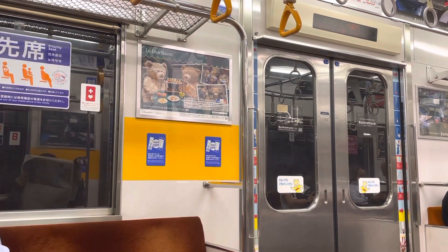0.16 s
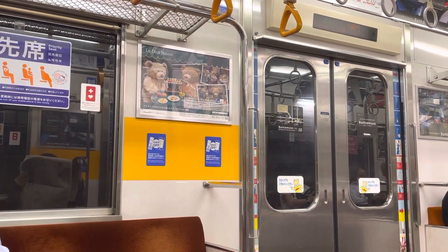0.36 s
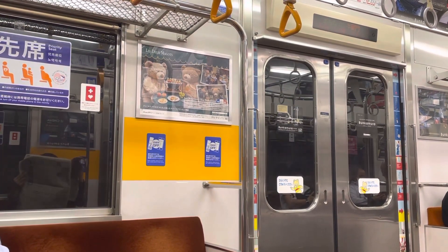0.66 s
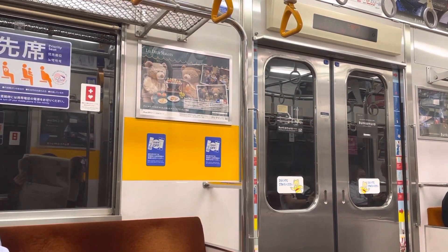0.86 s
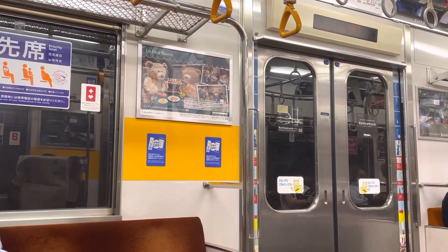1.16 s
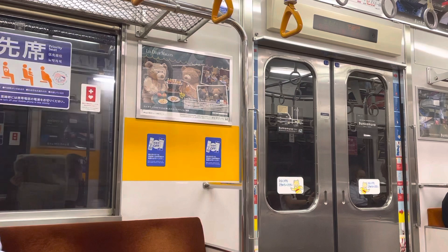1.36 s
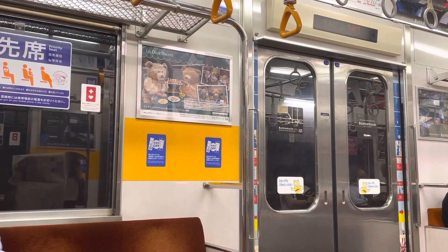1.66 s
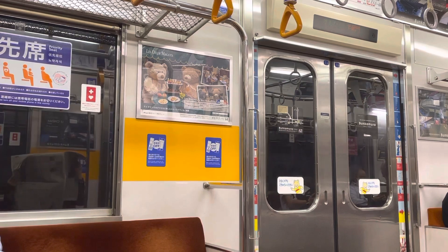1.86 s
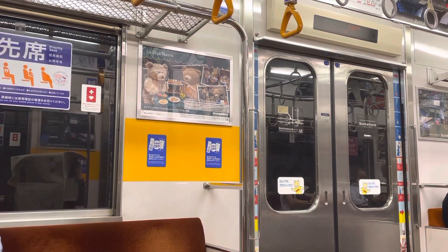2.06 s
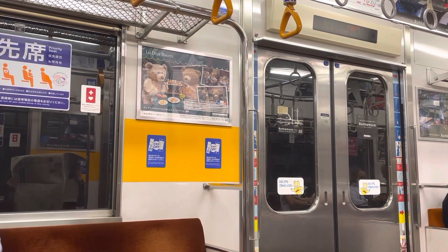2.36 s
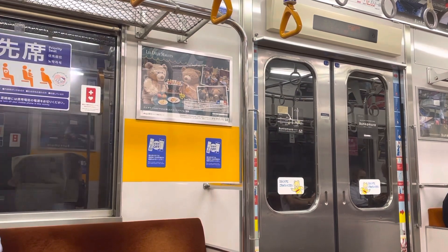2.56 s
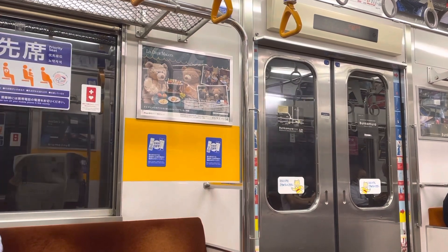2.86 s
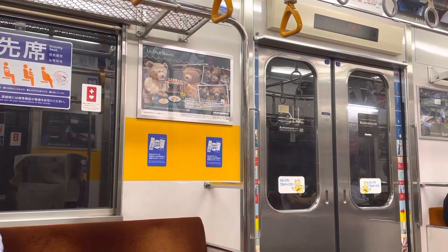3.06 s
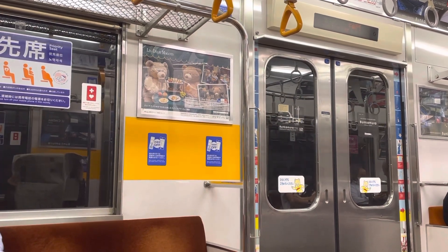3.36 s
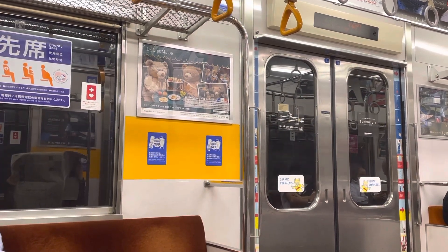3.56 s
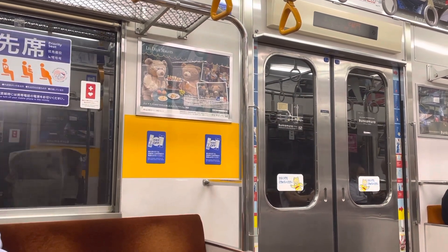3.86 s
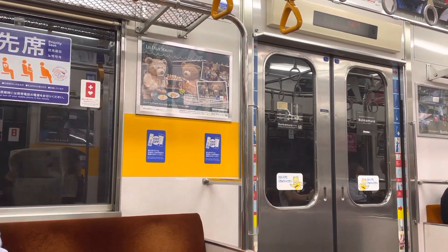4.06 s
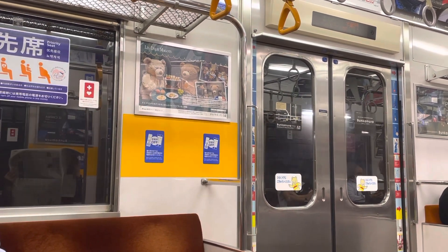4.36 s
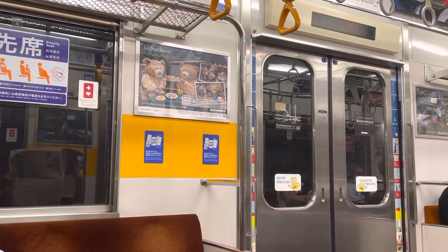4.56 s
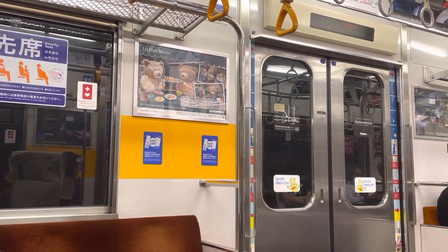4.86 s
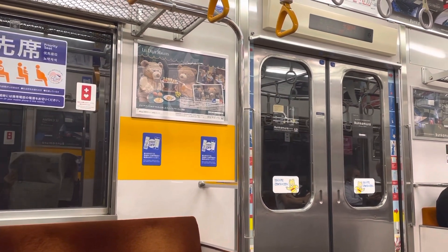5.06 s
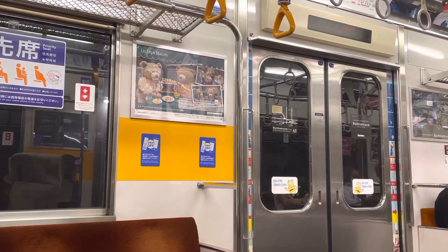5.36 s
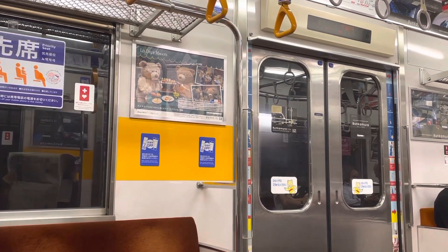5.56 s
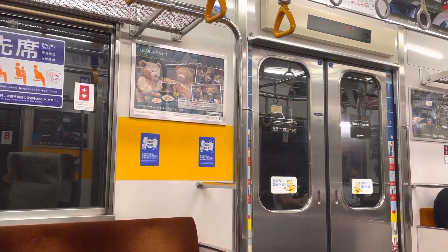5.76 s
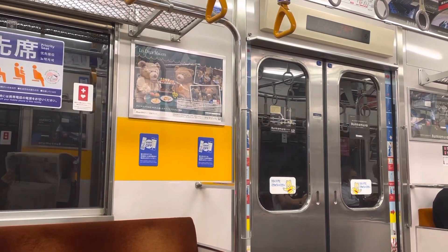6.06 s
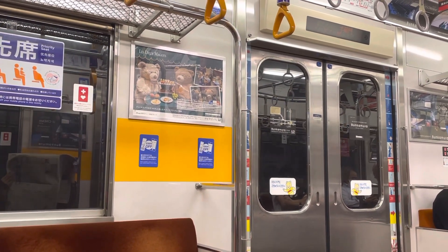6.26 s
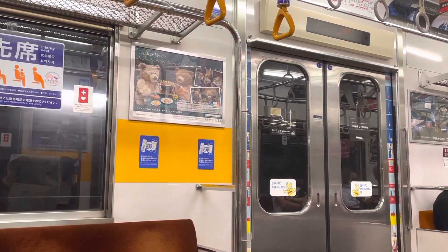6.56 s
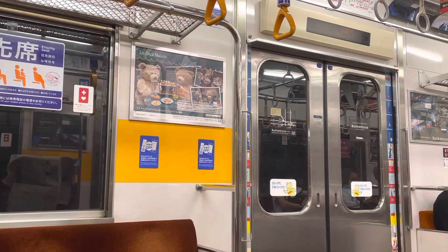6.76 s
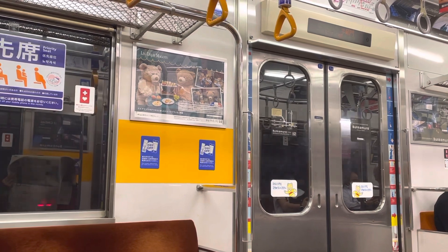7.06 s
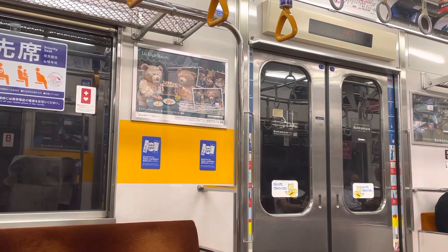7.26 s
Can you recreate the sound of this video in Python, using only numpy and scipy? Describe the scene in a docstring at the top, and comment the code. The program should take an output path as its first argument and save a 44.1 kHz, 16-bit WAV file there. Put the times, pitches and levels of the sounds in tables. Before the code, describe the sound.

Heard from a seat by the door of a moving subway car: two underfloor machines hum low and beat about twice a second under steady rumble and airy ventilation. From about two seconds the wheel roar and low rail howl surge louder, with joint thumps and brief rough squeaks. Near five and a half seconds the roar drops and compressed air hisses, then again more faintly.

```python
"""Two machines under the floor hum and beat against each other, heard inside a subway car in a tunnel.
The body rumbles; filtered noise makes the wheels' roar, which swells and dies away over the ventilation.
Ripples on the rail howl in surges, bands of the roar swell briefly, and a few thin, rough squeaks sound.
Wheels thump over rail joints as decaying booms and knocks, and compressed air blows off twice as hiss."""
import sys
import numpy as np
from scipy import signal
from scipy.fft import irfft, next_fast_len
from scipy.io import wavfile
from scipy.ndimage import uniform_filter1d, map_coordinates

SR = 44100
rng = np.random.default_rng(int(sys.argv[2]) if len(sys.argv) > 2 else 0)


def generate_wav(sig):
    """Save sig (samples, or channels by samples) to the path in sys.argv[1] as 16-bit PCM at SR."""
    pcm = np.round(np.clip(np.atleast_2d(sig).T, -1, 1) * 32767).astype(np.int16)
    wavfile.write(sys.argv[1], SR, pcm)


N = 326763
TIME = np.arange(N) / SR  # s
FREQ = np.maximum(np.fft.rfftfreq(2 * next_fast_len(N // 2 + 1), 1 / SR), 1)  # Hz, kept above 0 for the logs


def undb(db):
    """Turn decibels into an amplitude ratio."""
    return 10 ** (np.asarray(db) / 20)


def shape(rows, axis=1):
    """One column of a table, joined by straight lines over log frequency."""
    rows = np.asarray(rows, float)
    return np.interp(np.log(FREQ), np.log(rows[:, 0]), rows[:, axis])


def curve(rows, axis=1):
    """One column of a table, joined by straight lines over time."""
    rows = np.asarray(rows, float)
    return np.interp(TIME, rows[:, 0], rows[:, axis])


def ramp(start_s, length_s):
    """Rises evenly from 0 to 1."""
    return np.clip((TIME - start_s) / length_s, 0, 1)


def unit(x):
    """Scale a stereo sound so that its mid has rms 1."""
    return x / np.std(x.mean(0))


def walk(rate):
    """Smooth chance with about `rate` turns a second and spread near 1."""
    k = int(SR / rate)
    steps = np.repeat(rng.standard_normal(N // k + 3), k)
    smooth = uniform_filter1d(uniform_filter1d(steps, k), k)
    return 1.3 * smooth[k:k + N]


def tone(hz):
    """A sine of rms 1 that follows a pitch curve."""
    return np.sqrt(2) * np.sin(2 * np.pi * np.cumsum(hz) / SR)


def band(hz, width):
    """Gain of a steep resonance, down to half at `width` Hz either side."""
    return 1 / (1 + ((FREQ - hz) / width) ** 2)


def colour(spectrum, modes=()):
    """Gain over frequency: a broad slope with resonances standing on it."""
    lift_db = sum(db / (1 + (2 * (FREQ - hz) / width) ** 2) for hz, width, db in modes)
    return undb(shape(spectrum) + lift_db)


def echoes(depth_db, spacing_hz):
    """Reflections between the car's walls leave a fixed, irregular comb of peaks and dips."""
    knots = rng.standard_normal(8192)
    return undb(depth_db * np.interp(FREQ / spacing_hz, np.arange(len(knots)), knots))


def field(gain):
    """Stereo noise from a mid and a side part, whose balance varies with frequency."""
    # stereo spread of the noise, very wide near 8 and 14 kHz: (frequency [Hz], side minus mid [dB])
    width = [(30, -31), (60, -17), (120, -10), (240, -6.5), (400, -9), (650, -1.5), (1000, -3), (1800, -2),
             (2400, -12.5), (3200, -12.5), (4300, -40), (5800, -22), (7000, -7), (8200, 29), (9600, -3),
             (11500, -10), (13000, -16), (14500, 40)]
    # lean of the stereo image: (frequency [Hz], left minus right [dB], left leads [rad])
    skew = [(60, 4.5, 0.28), (125, -2, 0), (251, 4, 0.27), (493, 1, 0.86), (690, 3, 0), (895, 1.5, 0.7),
            (1370, 2, 0.02), (2400, 2.5, 0.34), (4000, 0.5, 0)]
    real, imaginary = rng.standard_normal((2, len(FREQ))), rng.standard_normal((2, len(FREQ)))
    mid, side = (real + 1j * imaginary) * np.sqrt(N * SR) / 2
    spread = undb(shape(width))
    lean = undb(shape(skew) / 2) * np.exp(.5j * shape(skew, axis=2))
    channels = np.array([(mid + spread * side) * lean, (mid - spread * side) / lean])
    return irfft(channels * gain / np.hypot(1, spread))[:, :N]


def glide(x, speed):
    """Move all the resonances of a sound up and down by a ratio that changes over time."""
    position = np.cumsum(speed)
    return np.array([map_coordinates(channel, [position], order=1, mode="mirror") for channel in x])


def running(law):
    """Gain of a running noise: it drifts slowly and takes its share of the rail's roughness."""
    db, db_per_s, share = law
    # a stretch of rough rail: met quickly, worse the further it goes, then left behind
    rough_from_s, attack_s, rough_until_s, release_s = 2.26, 0.53, 5.61, 0.44
    rough_db, rough_db_per_s = 3, 1.72  # lift on meeting it, and its growth; both before the share
    on_rough = ramp(rough_from_s, attack_s) - ramp(rough_until_s, release_s)
    lift_db = on_rough * (rough_db + rough_db_per_s * (TIME - rough_from_s))
    # a short smooth stretch just after it
    smooth_s, smooth_length_s, smooth_dip_db = 6.28, 0.083, 1
    dip_db = smooth_dip_db * np.exp(-((TIME - smooth_s) / smooth_length_s) ** 2)
    return undb(db + db_per_s * TIME + share * (lift_db - dip_db))


def machines(second_db=-3.0, ease_db=4, ease_s=5.3, ease_length_s=0.44, flutter_db=1.25,
             line_flutter_db=3.5, drift=0.00411):
    """Two motors at slightly different speeds beat about twice a second; later the second eases off."""
    # weaker lines of the machinery: (frequency [Hz], level [dB])
    weak_lines = [(24.3, -45), (48.6, -36), (71.1, -44.5), (116, -37), (183.5, -39), (350, -43.5)]
    hum_hz, beat_hz, in_step_s = 57.95, 2.08, .264
    # the stronger machine: full level, how far below it starts, time constant of the approach
    hum_db, build_db, build_s = -19, 6, 5.4
    turn = 2 * np.pi * (TIME - in_step_s)
    first = undb(flutter_db * walk(7.1)) * np.cos(hum_hz * turn)
    second_gain = undb(second_db - ease_db * ramp(ease_s, ease_length_s))
    second = second_gain * np.cos((hum_hz - beat_hz) * turn)
    load = undb(hum_db - build_db * np.exp(-TIME / build_s))
    lines = 0
    for hz, db in weak_lines:
        level = undb(db + line_flutter_db * walk(3.014))
        lines = lines + level * tone(hz * (1 + drift * walk(4.01)))
    return np.sqrt(2) * load * (first + second) + lines


def gears(drift=0.00901, octave_db=-13, flutter_db=2.5):
    """The gears whine faintly and unsteadily, with a weaker octave; the whine swells and fades."""
    whine_hz, whine_db, peak_s = 379, -28, 3.74
    rise_db_per_s, fall_db_per_s = 6.5, 12.5
    hz = whine_hz * (1 + drift * walk(22.05))
    age = TIME - peak_s
    db = whine_db + np.minimum(rise_db_per_s * age, -fall_db_per_s * age)
    return (tone(hz) + undb(octave_db) * tone(2 * hz)) * undb(db + flutter_db * walk(15))


def body(drone_hz=94, drone_db=-1, drone_db_per_s=-0.1, drift=0.0344, flutter_db=2):
    """The bogies shake the car body; one floor panel drones in fits on a wavering note, to the end."""
    # slope of the rumble: (frequency [Hz], relative level per Hz [dB])
    rumble_slope = [(15, -27), (25, -12), (34, -17), (46, -6), (75, 0.5), (108, -1), (140, -0.5),
                    (185, -2.5), (220, -9.5), (320, -32), (700, -76)]
    # course of the rumble: (level at the start [dB], drift [dB per s], share of the rough rail's lift)
    rumble_law = (-27, 0.45, 0.033)
    # the floor panel's drone, ahead of the trim and slight drift added below: (time [s], level [dB])
    drone_course = [(0.0, -23), (0.49, -24), (0.91, -30), (1.57, -21.5), (1.67, -31.5), (3.03, -25.5),
                    (3.36, -39), (3.42, -30), (3.59, -26), (3.65, -39), (3.94, -24), (4.89, -27.5),
                    (5.86, -22.5), (5.92, -34), (6.0, -26), (6.73, -43), (6.77, -16), (6.85, -46),
                    (6.97, -25), (7.29, -33), (7.37, -22), (7.41, -25)]
    db = drone_db + drone_db_per_s * TIME + curve(drone_course) + flutter_db * walk(13)
    drone = tone(drone_hz * (1 + drift * walk(12))) * undb(db)
    rumble = unit(field(colour(rumble_slope))) * running(rumble_law)
    return drone + rumble


def wheels(judder_db=0.97, comb_db=1.5, comb_hz=14, wander=0.01003):
    """Rail roughness rings the car's modes and, higher up, the wheels; the roar's pitch wanders a little."""
    # slopes of the low roar and the higher rasp: (frequency [Hz], relative level per Hz [dB])
    roar_slope = [(120, -33), (165, -21), (205, -9.5), (240, -3.5), (285, -1.5), (320, -5.5), (365, 0.5),
                  (420, -2), (500, -2.5), (565, -5), (625, -15.5), (800, -22.5), (2000, -65)]
    rasp_slope = [(350, -29), (600, -2.5), (740, 0), (880, -4), (1060, -5.5), (1230, -12), (1650, -17),
                  (2300, -18.5), (3200, -26.5), (6000, -39), (12000, -55)]
    # resonances on top of those slopes: (frequency [Hz], width [Hz], lift [dB])
    car_modes = [(290, 17, 5.5), (465, 18, 7), (500, 17, 4), (541, 19, 3.5)]
    wheel_modes = [(1408, 78, 6.9), (1960, 180, 4.4)]
    # course of each noise: (level at the start [dB], drift [dB per s], share of the rough rail's lift)
    roar_law = (-32, 0.13, 1.37)
    rasp_law = (-39, 0.1, 0.93)
    judder = judder_db * walk(21.95)
    steady_roar = unit(field(colour(roar_slope, car_modes)))
    roar = glide(steady_roar, 1 + wander * walk(4)) * running(roar_law)
    rasp_gain = colour(rasp_slope, wheel_modes) * echoes(comb_db, comb_hz)
    rasp = unit(field(rasp_gain)) * running(rasp_law)
    return (roar + rasp) * undb(judder)


def corrugation(width_hz=17, centre_hz=246, note_db=-4.0, scrape_db=-2.5, waver=0.0279, flutter_db=2.5,
                pan_db=3):
    """Ripples on the rail head howl in surges, on a low note that follows their spacing."""
    # howl, note and scrape each lying a little below its level: (time [s], pitch [Hz], level [dB])
    howl = [(0.0, 241, -43), (0.04, 246, -34.5), (1.79, 248.7, -38.5), (1.96, 244, -27.5),
            (2.15, 245.5, -37.5), (2.43, 247.4, -28), (2.72, 247, -42), (2.85, 247.8, -22.5),
            (3.09, 247.7, -35.5), (3.18, 248.4, -21.5), (3.24, 244, -39), (3.44, 248.3, -19),
            (3.49, 248, -31), (3.82, 248, -23.5), (3.98, 249, -28.5), (4.35, 246, -21.5),
            (4.87, 247.3, -24.5), (4.95, 251, -34), (5.01, 245.4, -21), (5.9, 245.5, -26),
            (6.05, 244.5, -39), (6.17, 245, -24), (6.25, 245, -45), (6.35, 250.7, -24), (6.83, 244.5, -44),
            (6.87, 246.8, -23), (6.97, 245, -35), (6.99, 247.5, -27), (7.39, 244, -38), (7.41, 242, -29)]
    hz = curve(howl) * (1 + waver * walk(25))
    pan = undb(np.array([[pan_db], [-pan_db]]) / 2)  # the left channel gets more of the note
    note = tone(hz) * undb(note_db + flutter_db * walk(30)) * pan
    scrape = undb(scrape_db) * glide(unit(field(band(centre_hz, width_hz))), hz / centre_hz)
    return (note + scrape) * undb(curve(howl, axis=2))


def treads(flutter_db=2):
    """Light rubbing keeps a few wheel modes ringing, each fluttering on its own, then eases off."""
    # what the rubbing rings: (frequency [Hz], half-width [Hz], relative level [dB])
    ring_modes = [(1847, 116, 0.5), (2423, 110, -1), (5880, 120, -17.5)]
    rub_db, until_s, release_s, drop_db = -45.5, 4.6, 0.96, 8
    rings = 0
    for hz, width, db in ring_modes:
        rings = rings + unit(field(band(hz, width))) * undb(db + flutter_db * walk(24.73))
    return unit(rings) * undb(rub_db - drop_db * ramp(until_s, release_s))


def air_wash(comb_db=1, comb_hz=20, flutter_db=1.4, flutter_hz=70):
    """Air from the ceiling ducts and along the tunnel wall; interleaved bands flutter each on their own."""
    # slope of the air noise: (frequency [Hz], level per Hz [dB])
    wash_slope = [(130, -76.5), (285, -52), (340, -55.5), (500, -56), (620, -59), (760, -63.5),
                  (1100, -70.5), (1600, -71), (2450, -74), (3000, -79.5), (3800, -84), (5000, -86.5),
                  (6800, -93), (8200, -91.5), (12000, -100.5), (15500, -108)]
    gain = colour(wash_slope) * echoes(comb_db, comb_hz)
    # each slice of flutter_hz falls by chance to one of six groups
    owner = rng.integers(0, 6, 4096)[(FREQ // flutter_hz).astype(int)]
    return sum(field(gain * (owner == k)) * undb(flutter_db * walk(50)) for k in range(6))


def joints(push_s=0.0036, knock_hz=480, knock_width_hz=350, knock_t60=0.26):
    """A wheel drops over a joint: the floor booms and the fittings knock."""
    # rail joints: (time [s], level [dB], boom pitch [Hz], boom t60 [s], knock against that level [dB])
    drops = [(1.96, -17, 182.5, 0.32, -24), (3.21, -18.5, 176.8, .5, -28), (4.292, -12, 193.2, 0.32, -26),
             (5.5, -16, 150.5, 0.38, -22), (5.772, -12, 177.8, 0.18, -9.5),
             (6.725, -17.5, 170.5, 0.48, -22), (7.152, -2.8, 141.4, 0.15, -17),
             (7.333, -12.5, 97, 0.24, -14.5)]
    out, knock = 0, unit(field(band(knock_hz, knock_width_hz)))
    for s, db, hz, t60, knock_db in drops:
        age = np.maximum(TIME - s, 0)
        boom = np.sin(2 * np.pi * hz * age) * np.exp(-np.log(1000) * age / t60)
        rattle = undb(knock_db) * knock * np.exp(-np.log(1000) * age / knock_t60)
        push = 1 - np.exp(-age / push_s)
        out = out + undb(db) * push * (boom + rattle)
    return out


def roar_swells():
    """Brief swells of the roar, each a burst of noise in one band that rises and falls smoothly."""
    # swells: (centre time [s], length [s], band centre [Hz], half-width [Hz], level [dB])
    swells = [(2.55, 0.43, 813, 78, -36.5), (3.02, 0.52, 505, 34, -31.5), (4.021, .3, 480, 68, -24),
              (4.05, 0.64, 720, 43, -34), (4.03, 0.22, 970, 50, -37), (4.09, .2, 355, 20, -27),
              (4.6, 0.13, 910, 77, -35), (4.479, .15, 494, 14, -22), (4.918, 0.14, 735, 30, -30),
              (4.918, 0.13, 1006, 50, -34), (4.92, 0.3, 480, 50, -25), (5.15, 0.18, 525, 20, -23),
              (5.097, 0.18, 430, 16, -23), (5.2, 0.28, 740, 90, -32.5), (5.27, 0.22, 355, 21, -24.5),
              (4.8, 0.28, 243, 35, -24.5), (5.34, 0.17, 234, 18.5, -24), (5.32, 0.29, 500, 46, -23.5),
              (5.81, .2, 376, 22.5, -24), (5.861, 0.36, 445, 19, -26.5)]
    out = 0
    for s, length, hz, width, db in swells:
        swell = np.cos(np.pi * np.clip(TIME - s, -length / 2, length / 2) / length) ** 2
        burst = swell * field(band(hz, width))
        out = out + undb(db) * unit(burst) * np.std(swell)  # level tied to the length of the swell
    return out


def squeaks(rough_db=4.0):
    """Thin rough squeaks, each a jittery tone with a weak third harmonic."""
    # squeaks, the two at 5.74 and 6.85 s being the air valve ringing: (centre time [s], length [s],
    # pitch [Hz], glide [Hz per s], level [dB], pitch waver [share], third harmonic against the note [dB])
    squeak_rows = [(3.862, 0.15, 2300, 202, -43, .024, -24), (4.016, 0.12, 2360, 200.5, -46, .024, -22),
                   (4.94, 0.1, 1420, 599, -34.5, .016, -29), (5.255, 0.15, 1400, -100, -40.5, .016, -28),
                   (5.74, 0.26, 2300, 0, -45, 0.022, -24), (6.85, .14, 2400, -1, -47, .014, -22),
                   (7.129, 0.065, 1930, 351.5, -38.5, 0.0069, -16),
                   (7.227, .12, 1945, -1, -46.5, 0.007, -22)]
    out, jitter, roughness = 0, walk(200), undb(rough_db * walk(130))
    for s, length, hz, glide_hz, db, waver, third_db in squeak_rows:
        age = np.clip(TIME - s, -length / 2, length / 2)
        pitch = (hz + glide_hz * age) * (1 + waver * jitter)
        squeak = tone(pitch) + undb(third_db) * tone(3 * pitch)
        out = out + undb(db) * np.cos(np.pi * age / length) * squeak
    return out * roughness


def air_valve(sputter_db=0.7, comb_db=2.5, comb_hz=18, tilt_pivot_hz=4000):
    """A valve opens, compressed air hisses unevenly through its port, and the tunnel carries the tail."""
    # slope of the hiss: (frequency [Hz], relative level per Hz [dB])
    air_slope = [(600, -27), (1600, 2), (2300, 0.5), (2800, 1.5), (3700, -4.5), (4700, -1), (6000, -6.5),
                 (7400, -6), (8600, -7), (10500, -10.5), (12000, -10.5), (14000, -20), (15500, -19)]
    # resonances of the valve: (frequency [Hz], width [Hz], lift [dB])
    valve_modes = [(2320, 230, 2), (3480, 200, 5.4), (10520, 350, 6.6), (10562, 30, 8)]
    # the exhaust pipe's hollow note: (frequency [Hz], half-width [Hz], level over the hiss [dB])
    exhaust = (472, 36, 13)
    # blow-offs: (time [s], level of the hiss [dB], rise [s], hold [s], t60 [s], brightness [dB per octave])
    blows = [(5.527, -34.5, 0.061, 0.08, 0.64, -0.5), (6.697, -40.5, 0.093, 0.057, 0.52, 0)]
    outlet_hz, outlet_db = 1060, 2.5  # the short outlet pipe rings at every multiple of this note
    outlet = undb(outlet_db * np.cos(2 * np.pi * FREQ / outlet_hz))
    port = colour(air_slope, valve_modes) * outlet * echoes(comb_db, comb_hz)
    pipe_hz, pipe_width, pipe_db = exhaust
    pipe = undb(pipe_db) * unit(field(band(pipe_hz, pipe_width)))
    out = 0
    for s, db, rise, hold, t60, tilt_db in blows:
        tail = np.exp(-np.log(1000) * np.maximum(TIME - s - rise - hold, 0) / t60)
        tilt = undb(tilt_db * np.log2(FREQ / tilt_pivot_hz))
        hiss = unit(field(port * tilt))
        out = out + undb(db) * ramp(s, rise) * tail * (hiss + pipe)
    return out * undb(sputter_db * walk(70))


def scene():
    """Everything that reaches a seat by the door."""
    rolling = body() + wheels() + corrugation() + roar_swells() + treads() + squeaks() + joints()
    return machines() + gears() + rolling + air_valve() + air_wash()


def record(dry):
    """The recorder cuts the top steeply."""
    top_hz = 15600
    low_pass = signal.ellip(8, .2, 70, top_hz, fs=SR, output="sos")  # 0.2 dB ripple, 70 dB down above
    return signal.sosfilt(low_pass, dry)


dry = scene()
out = record(dry)
generate_wav(out)
```